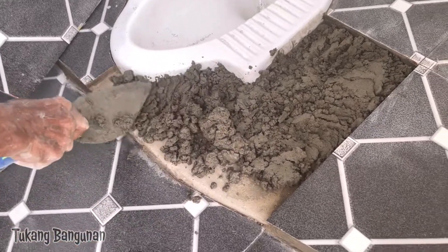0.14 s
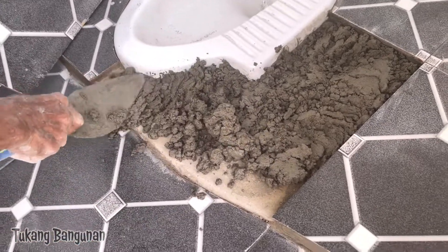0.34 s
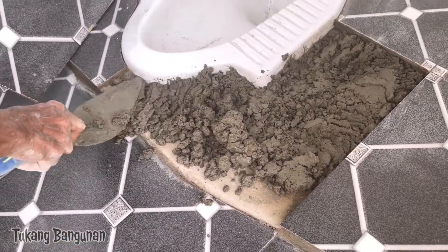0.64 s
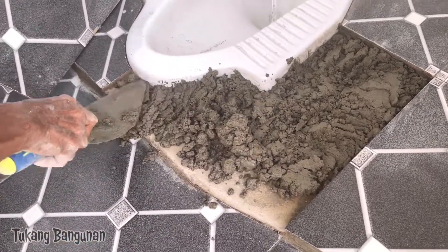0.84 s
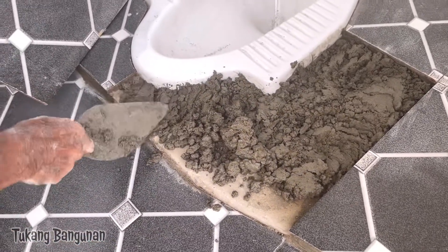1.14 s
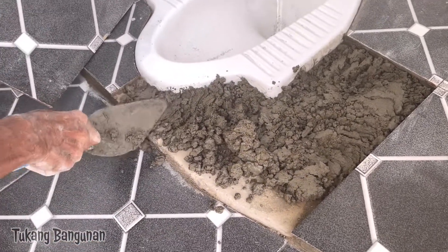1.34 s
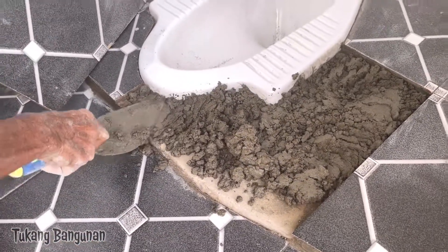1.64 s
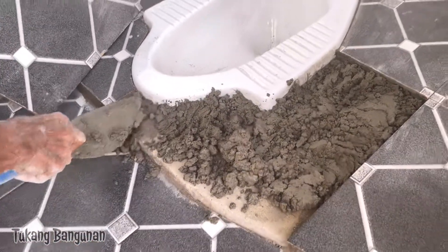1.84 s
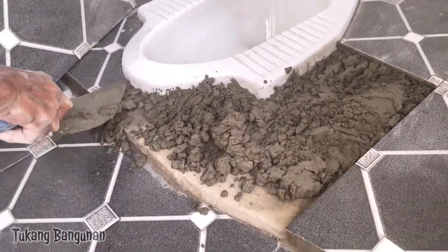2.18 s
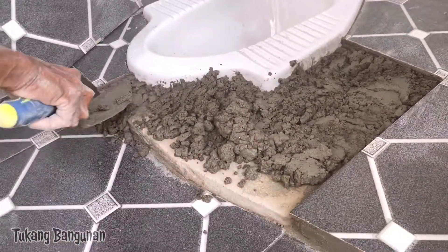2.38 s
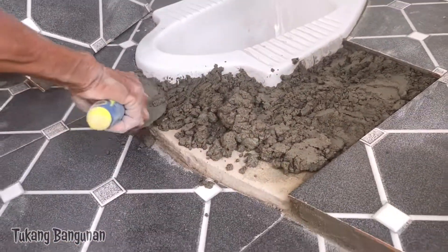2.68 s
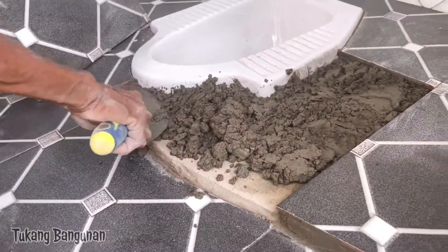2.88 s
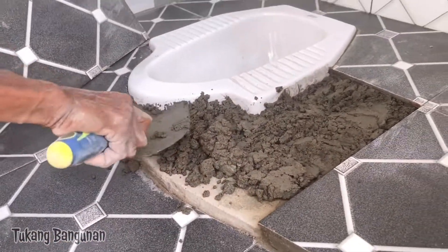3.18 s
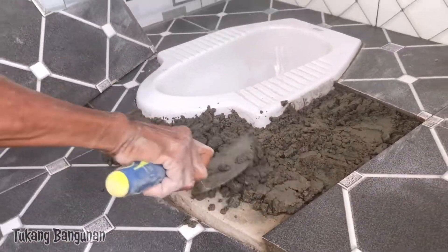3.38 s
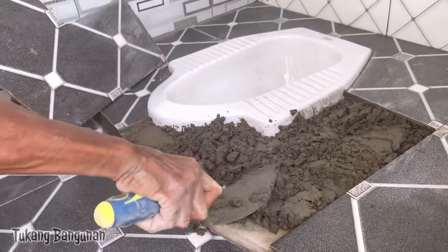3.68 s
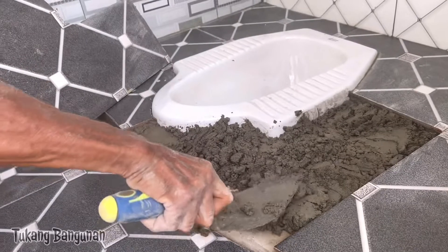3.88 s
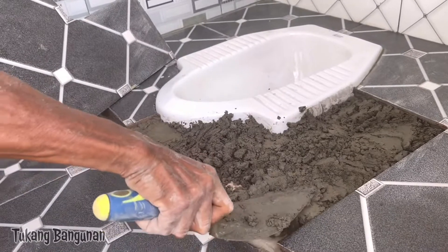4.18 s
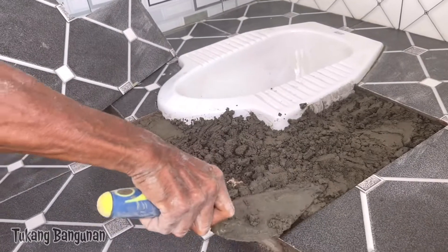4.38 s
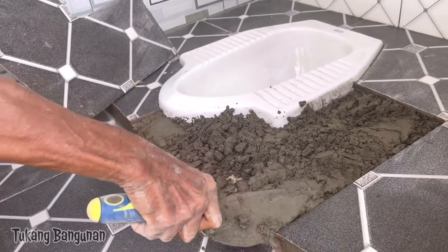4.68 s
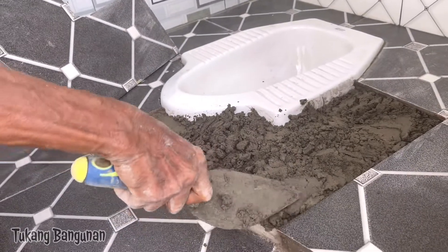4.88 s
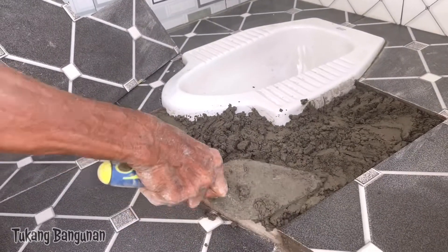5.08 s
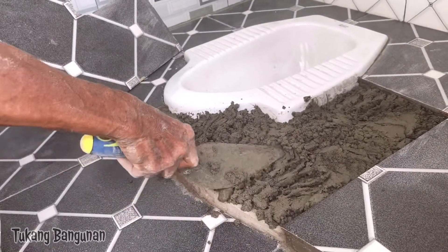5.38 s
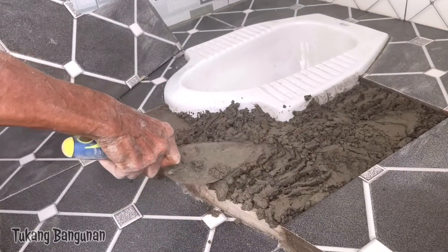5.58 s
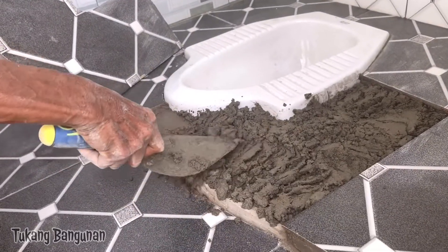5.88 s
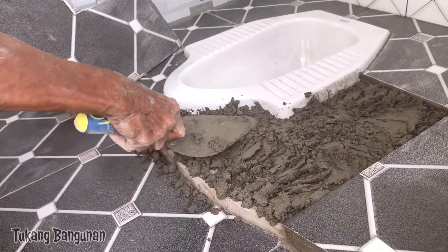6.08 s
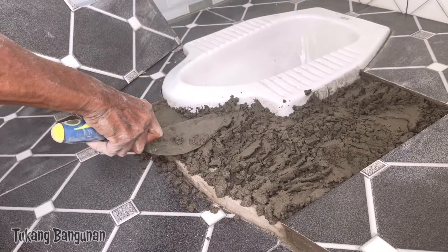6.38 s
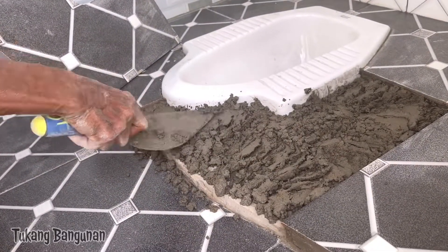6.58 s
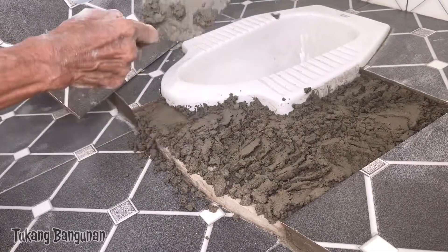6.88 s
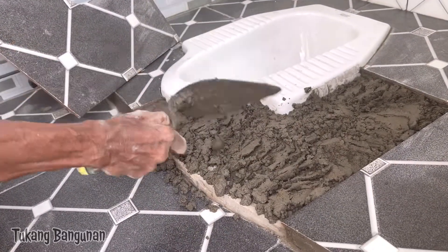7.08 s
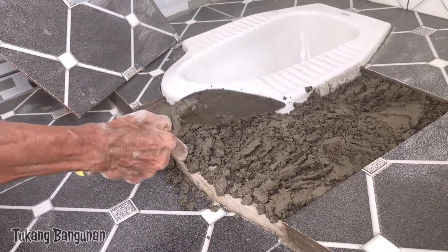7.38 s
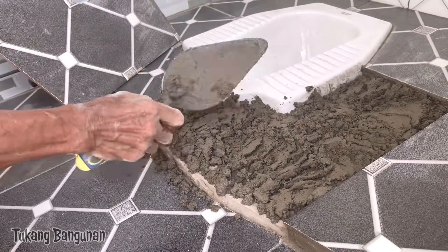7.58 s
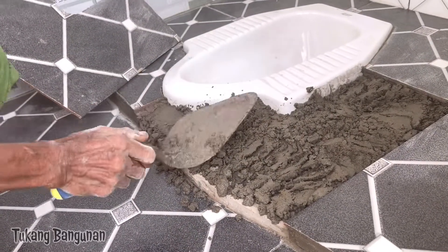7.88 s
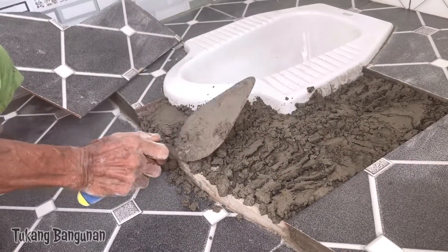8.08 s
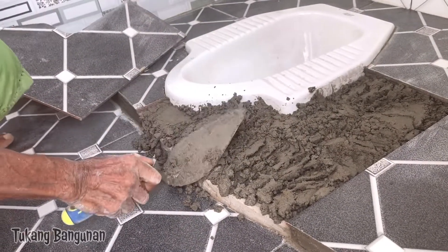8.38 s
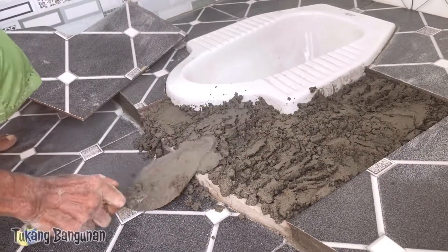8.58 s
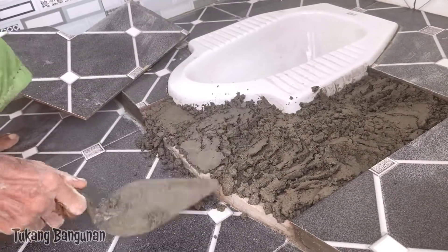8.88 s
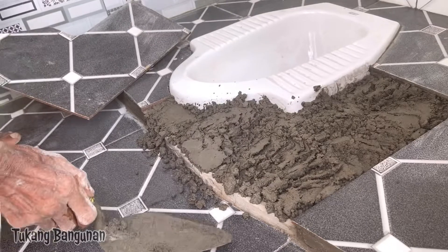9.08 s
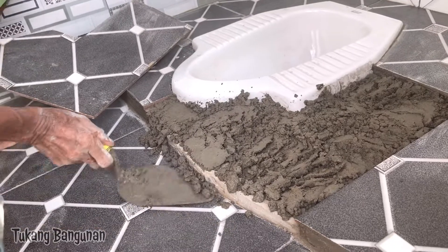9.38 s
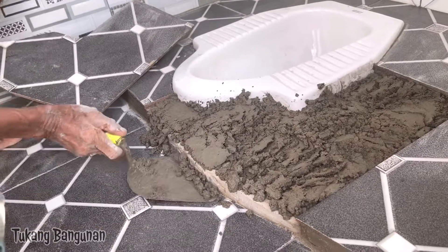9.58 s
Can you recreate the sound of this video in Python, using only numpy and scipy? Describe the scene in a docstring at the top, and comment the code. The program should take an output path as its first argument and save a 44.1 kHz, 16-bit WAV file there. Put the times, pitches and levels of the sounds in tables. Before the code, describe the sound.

A steel trowel rasps and pats damp gritty mortar in a small tiled room, with loud scraping on tile at the end.

```python
"""Trowel on damp mortar

A steel trowel spreads damp, sandy mortar in a small tiled room, an arm's length from a phone with two
microphone ports. Grit crushed under the blade hisses (filtered random grains), and coarser grains shake the
steel and bed (decaying modes). The blade knocks on tile and pats the heap, ringing on when lifted; thin
squeaks and a far bird are gliding notes, traffic is shaped noise. The ports hear the top octave out of step."""
import sys
import numpy as np
from scipy import signal
from scipy.fft import rfft, irfft, next_fast_len
from scipy.io import wavfile
from scipy.ndimage import uniform_filter1d, map_coordinates

SR = 44100
rng = np.random.default_rng(int(sys.argv[2]) if len(sys.argv) > 2 else 0)


def to_wav(s):
    """Save 16-bit WAV."""
    ch = np.atleast_2d(s).T  # columns
    pcm = np.round(np.clip(ch, -1, 1) * 32767)  # PCM
    wavfile.write(sys.argv[1], SR, pcm.astype(np.int16))


N = 429534  # samples

# modes of the free blade: (frequency [Hz], level [dB])
BLADE_MODES = [(312, -0.5), (377, 1.5), (550, -7), (660, 0.5), (790, -0.5), (1080, -1), (1453, -0.5),
               (1795, -5.5), (2541, -4), (2797, -3), (3280, -5), (3513, -5), (3935, -8), (4600, -6),
               (5550, -2.5), (6148, -2.5)]
# broad modes of blade, mortar bed and tile pressed together: (frequency [Hz], level [dB])
BED_MODES = [(305, -5), (460, -3), (900, -4), (1200, 0), (1470, -8), (2170, 1), (2850, -4), (3700, -10)]
# spectrum of crushed grit: (frequency [Hz], level [dB])
GRIT_SPECTRUM = [(1300, -36.5), (2800, -22), (6000, -17.5), (8000, -9), (9800, -7), (11000, 1),
                 (12000, -9.5), (13000, -21), (14000, -72)]
# spectrum of the rasping blade: (frequency [Hz], level [dB])
RASP_SPECTRUM = [(600, -14.5), (1100, 3.5), (1800, 11), (2600, 7), (4000, 3.5), (7000, -1), (12000, -19)]


def undb(db):
    """Amplitude factor of a level in dB."""
    return 10 ** (np.asarray(db) / 20)


def unit(x):
    """Scale to an RMS of 1."""
    return x / np.sqrt(np.mean(x ** 2))


def colour(x, shape):
    """Filter by (Hz, dB) points joined on a log axis."""
    hz, db = np.transpose(shape)
    size = next_fast_len(x.shape[-1])
    f = np.arange(size // 2 + 1) * SR / size
    gain = undb(np.interp(np.log(f + 1), np.log(hz), db))
    return irfft(rfft(x, size) * gain, size)[..., :x.shape[-1]]


def curves(table):
    """Join each column of a table over time by straight lines."""
    s, *columns = np.transpose(table)
    return [np.interp(np.arange(N) / SR, s, c) for c in columns]


def walk(rate):
    """Random levels held 1 / rate s and slewed twice; spread 1."""
    k = int(SR / rate)
    steps = np.repeat(rng.standard_normal(N // k + 1), k)
    return unit(uniform_filter1d(uniform_filter1d(steps, k), k)[:N])


def ring(x, hz, t60):
    """One decaying mode, driven by x; t60 is its time in s to fall 60 dB."""
    r = np.exp(-np.log(1000) / (t60 * SR))
    w = 2 * np.pi * hz / SR
    return signal.lfilter([0, np.sin(w)], [1, -2 * r * np.cos(w), r * r], x)


def diffuse(length):
    """Noise pair for sound from all sides, alike in the bass and the top octave."""
    # left-right difference against the common part: (frequency [Hz], level [dB])
    side_shape = [(50, -17.5), (200, -7.5), (600, 0.5), (1800, 3), (5000, 3), (8500, -7), (15000, -16)]
    mid, side = rng.standard_normal((2, length))
    side = colour(side, side_shape)
    return np.array([mid + side, mid - side])


def grains(rate, spread_db):
    """Sand grains cracking at random, rate per second: many small, a few large."""
    when = rng.random(N)
    size = np.minimum(rng.exponential(size=N), 3.5)
    return unit((when < rate / SR) * rng.standard_normal(N) * undb(spread_db * size))


def lifted(s):
    """1 while the blade is clear of the mortar and free to ring, else 0."""
    # spells of free blade: (from [s], to [s])
    spells = [(7.0, 8.3), (8.85, 9.17)]
    return sum((s > t0) * (s < t1) * 1. for t0, t1 in spells)


def ring_s(hz, free):
    """Ring time in s of a mode, free or buried in mortar: the higher, the shorter."""
    at_1khz_s = .095 if free else .028
    return at_1khz_s * (1000 / hz) ** 0.31


def pressure():
    """Levels in dB of hiss, rasp and rub: each stroke swells and fades; overlapping strokes add in power."""
    # strokes: (most pressure at [s], rise [s], fall [s], grit hiss [dB], blade rasp [dB], low rub [dB])
    stroke_table = [(0.0, .1, 0.57, -62, -64.5, -69), (.37, 0.027, 0.082, -43, -53, -49.5),
                    (.5, 0.14, 0.94, -57.5, -62, -70.5), (0.632, 0.048, 0.11, -39.5, -47.5, -54.5),
                    (.8, 0.11, 0.1, -54, -57.5, -67), (1.21, 0.11, 0.25, -51, -60.5, -82),
                    (1.45, 0.1, 0.3, -51.5, -58.5, -72), (1.54, 0.14, 0.076, -44.5, -53.5, -71),
                    (1.62, 0.1, 0.27, -51, -54, -55), (1.75, 0.027, 0.21, -51, -55, -55.5),
                    (1.84, 0.036, 0.027, -46.5, -51.5, -52), (1.98, 0.14, 0.22, -50.5, -49.5, -56.5),
                    (2.41, 0.46, 0.73, -53, -59.5, -63), (2.64, 0.16, 0.24, -49, -58.5, -69),
                    (2.929, 0.21, 0.18, -41, -51, -67), (3.011, 0.096, 0.048, -43, -62, -66),
                    (3.24, 0.25, 0.31, -70, -59.5, -54.5), (3.361, 0.097, 0.44, -47.5, -56.5, -86),
                    (3.63, 0.089, 0.3, -49.5, -57.5, -60.5), (3.811, 0.13, 0.15, -45.5, -50.5, -84),
                    (3.96, 0.1, 0.12, -41.5, -50, -77), (4.109, 0.24, 0.065, -46, -53, -63.5),
                    (4.25, 0.1, 0.081, -43.5, -50, -61.5), (4.38, 0.067, 0.06, -40.5, -45, -63),
                    (4.52, 0.11, 0.12, -41, -48.5, -65.5), (4.65, 0.043, 0.092, -40.5, -47, -61),
                    (4.822, 0.097, 0.14, -40.5, -51, -64.5), (5.118, 0.029, 0.029, -44, -51, -72),
                    (5.182, 0.071, 0.36, -41.5, -47.5, -72), (5.62, 0.24, 0.27, -47, -50.5, -76),
                    (5.785, 0.078, 0.13, -48, -56.5, -68.5), (6.14, 0.066, 0.87, -50.5, -58.5, -69),
                    (6.3, 0.47, 0.49, -54, -58, -85), (6.55, 0.53, 0.14, -46, -54, -74),
                    (7.079, 0.15, 0.14, -59, -68.5, -75), (7.5, 0.23, 0.16, -58.5, -64, -70.5),
                    (7.611, 0.11, 0.23, -53.5, -61.5, -57.5), (8.0, 0.092, 1, -55, -57.5, -67),
                    (8.55, 0.38, 0.18, -37.5, -44.5, -63), (8.64, 0.096, 0.11, -40.5, -51, -52),
                    (8.899, 0.089, 0.43, -60, -58, -58), (9.15, 0.41, 0.18, -56, -70, -72),
                    (9.211, 0.0033, 0.012, -23, -49, -62), (9.24, 0.0091, 0.015, -27.5, -40.5, -51),
                    (9.265, 0.022, 0.066, -23.5, -39, -45.5), (9.33, 0.14, 0.23, -31, -43.5, -53.5),
                    (9.427, 0.14, 0.049, -22.5, -40.5, -49), (9.469, 0.033, 0.12, -28, -45.5, -78),
                    (9.582, 0.012, .016, -24, -62, -67), (9.605, 0.034, 0.096, -27, -46, -57)]
    # resting level under the strokes: (hiss [dB], rasp [dB], rub [dB])
    rest_levels = (-99, -91.5, -80.5)
    fade_depths = (1, 1, 0.83)  # share of the fade that hiss, rasp and rub follow
    t = np.arange(0, N / SR, .001)
    peak, rise, fall, *tops_db = np.transpose(stroke_table)[:, :, None]
    away = np.where(t < peak, (peak - t) / rise, (t - peak) / fall)
    fade_db = 27 * away ** 1.474  # 27 dB lost over one rise or fall time
    levels = []
    for top_db, depth, rest_db in zip(tops_db, fade_depths, rest_levels):
        power = np.sum(undb(top_db - depth * fade_db) ** 2, axis=0) + undb(rest_db) ** 2
        levels.append(np.interp(np.arange(N) / SR, t, 10 * np.log10(power)))
    return levels


def shaken_modes(coarse, modes, free):
    """Coarse grains ring the bed or blade; grip and load shift, so each mode comes and goes on its own."""
    tilt_db, sway_db, sway_rate, shorten = (2.5, 4.5, 10, .6) if free else (0, 3, 35, .4)
    total = 0
    for hz, db in modes:
        level_db = db + tilt_db * np.log2(hz / 1000) + sway_db * walk(sway_rate)
        total = total + undb(level_db) * unit(ring(coarse, hz, shorten * ring_s(hz, free)))
    # modes slide as the bed thins or the blade bends: read faster and slower
    swing_s = .003 if free else .016
    where = np.arange(N) + swing_s * SR * walk(4)
    return map_coordinates(unit(total), [where], order=1, mode="mirror")


def strokes():
    """Grit hisses, shakes the blade and rubs the bed; the drag catches and slips, more so when pressed hard."""
    # spectrum of the low rub: (frequency [Hz], level [dB])
    rub_spectrum = [(150, -34), (280, 1.5), (450, -4), (750, -0.5), (1100, -12.5), (1600, -87.5)]
    hiss_db, rasp_db, rub_db = pressure()
    lift = uniform_filter1d(lifted(np.arange(N) / SR), SR // 20)
    drag_db = 0.83 * walk(45) + 0.19 * np.maximum(hiss_db + 44, 0) * walk(90)
    grit = grains(12000, 0.21)
    coarse = grains(5000, 2.85)
    bed = shaken_modes(coarse, BED_MODES, False)
    blade = shaken_modes(coarse, BLADE_MODES, True)
    # hard pressure crushes lumps, which ring bed and blade more
    crush = .3 * undb(.4 * np.maximum(rasp_db + 48, 0))
    shaken = coarse + crush * (1 - lift) * (bed + .6 * blade) + .7 * lift * blade
    hiss = unit(colour(grit + 0.43 * lift * blade, GRIT_SPECTRUM)) * undb(hiss_db + drag_db)
    rasp = unit(colour(shaken, RASP_SPECTRUM)) * undb(drag_db + rasp_db + 0.18 * walk(25))
    rub = unit(colour(shaken, rub_spectrum)) * undb(rub_db + 2 * walk(15))
    return hiss + rasp + rub


def tones(table, rough_t60, rise, octave_db, bluntness):
    """Swelling notes, each a narrow band of noise with a weak octave, gliding by the share rise either side."""
    out = np.zeros(N)
    decay = np.exp(-np.log(1000) / (rough_t60 * SR))
    wobble = signal.lfilter([1], [1, -decay], rng.standard_normal((2, N)))
    wobble = wobble / wobble.std()
    for s, length, hz, db in table:
        i, n = int(max(s, 0) * SR), int(length * SR)
        phase = np.cumsum(2 * np.pi * hz / SR * (1 + rise * np.linspace(-1, 1, n)))
        # roughness grows with the length of the note
        a, b = 12 * length * wobble[:, i:i + n]
        octave = undb(octave_db - 8 * np.log2(hz / 1000)) * np.sin(2 * phase)
        note = (1 + a) * (np.sin(phase) + octave) + b * np.cos(phase)
        out[i:i + n] += undb(db) * np.hanning(n) ** bluntness * unit(note)
    return out


def squeaks():
    """Squeaks and thin rings, rough tones that sink slightly."""
    # notes: (start [s], length [s], middle pitch [Hz], level [dB])
    squeak_table = [(0, 0.18, 2710, -61.5), (.836, 0.018, 895, -37.5), (1.75, 0.11, 2000, -50),
                    (2.13, 0.1, 2760, -62), (7.0, 0.2, 6080, -72), (7.12, .15, 3420, -70.5),
                    (8.91, 0.12, 663, -55.5)]
    return tones(squeak_table, rough_t60=.01, rise=-.01, octave_db=-13, bluntness=1)


def room(x):
    """Tiled walls: dense echoes from 4 ms on, the treble dying first."""
    t60_s, treble_t60_s, level_db = 0.3, 0.078, -8
    t = np.arange(SR // 2) / SR
    echo = diffuse(len(t)) * (t > .004)
    low = signal.lfilter(*signal.butter(1, 2500, fs=SR), echo)
    treble = echo - low
    echo = low * undb(-60 * t / t60_s) + treble * undb(-60 * t / treble_t60_s)
    echo = echo / np.sqrt(np.sum(echo ** 2) / 2)
    return undb(level_db) * signal.oaconvolve(x[None], echo, axes=1)[:, :N]


def outside():
    """Traffic's swelling rumble and wavering hum, and faint air, all from noise shaped in pitch and level."""
    # traffic: (time [s], rumble level [dB], hum level [dB])
    traffic = [(0.0, -53.5, -56.5), (1.05, -55.5, -65), (1.3, -60.5, -58), (2.7, -59, -63),
               (3.25, -55.5, -54), (3.6, -57, -67), (4.15, -52.5, -59), (5.7, -58.5, -63),
               (6.15, -49, -66.5), (6.45, -57.5, -68.5), (9.35, -55, -62)]
    # spectrum of the rumble: (frequency [Hz], level [dB])
    rumble_spectrum = [(35, -5.5), (58, 3), (100, -6), (160, -12), (250, -19.5), (500, -24), (900, -72)]
    # spectrum of the faint air: (frequency [Hz], level [dB])
    air_spectrum = [(400, 19.5), (1100, 10.5), (2300, 28), (3600, 8.5), (7800, 27.5), (11000, -24.5),
                    (12800, -62)]
    hum_hz, hum_width_hz = 154.5, 9.7
    rumble_db, hum_db = curves(traffic)
    rumble = unit(colour(diffuse(N), rumble_spectrum)) * undb(rumble_db + 1.3 * walk(5.9))
    hum_t60 = np.log(1000) / (np.pi * hum_width_hz)
    hum = unit(ring(rng.standard_normal(N), hum_hz, hum_t60)) * undb(hum_db)
    air = unit(colour(diffuse(N), air_spectrum)) * undb(-69.5 + 2.1 * walk(9))
    return rumble + hum + air


def bird():
    """A far bird: short rough notes that glide upwards."""
    # notes: (start [s], length [s], middle pitch [Hz], level [dB])
    bird_table = [(.275, 0.017, 1745, -56), (.295, 0.048, 2026, -50.5), (.95, 0.046, 2105, -59),
                  (4.865, 0.054, 1730, -53.5), (4.88, 0.131, 1990, -58.5), (6.0, 0.048, 1730, -62),
                  (6.055, 0.048, 1960, -58.5)]
    return tones(bird_table, rough_t60=.004, rise=.035, octave_db=-35, bluntness=.5)


def knocks():
    """A short rough contact and crumbling mortar ring the bed, or the free blade, and crack the grit."""
    # knocks: (time [s], body peak [dB], crack peak [dB], loudest pitch [Hz])
    knock_table = [(0.347, -41, -36, 1050), (0.372, -19.5, -30.5, 1170), (0.605, -35, -23, 860),
                   (0.632, -28.5, -23, 1004), (1.567, -35.5, -28, 2310), (1.59, -37, -21.5, 910),
                   (1.675, -37, -62, 697), (1.732, -33.5, -36, 890), (1.822, -33, -49, 1084),
                   (1.964, -16.5, -23.5, 1193), (2.283, -43, -32.5, 935), (2.513, -40, -68, 379),
                   (3.196, -27, -54.5, 892), (4.643, -20.5, -14.5, 1278), (4.264, -43.5, -68, 764),
                   (7.005, -59, -43.5, 3280), (7.272, -57.5, -69, 2300), (7.609, -37, -41.5, 545),
                   (7.845, -42, -44.5, 640), (7.926, -45.5, -41, 666), (7.971, -42, -36.5, 544),
                   (7.999, -39.5, -40, 544), (8.089, -29.5, -31, 850), (8.163, -37.5, -36, 630),
                   (8.594, -25.5, -40, 648), (8.612, -31, -32, 340), (8.902, -39.5, -32, 1250),
                   (9.206, -32.5, -20, 435), (9.262, -27, -17, 1350), (9.287, -26, -47, 1039),
                   (9.339, -26, -50, 1430), (9.434, -30, -37, 2450), (9.594, -39, -27, 2570)]
    out = np.zeros(N + SR)
    t = np.arange(SR // 5) / SR
    luck = rng.standard_normal((len(knock_table), 2, len(BLADE_MODES)))
    noise = rng.standard_normal((len(knock_table), 2, len(t)))
    for (s, body_db, crack_db, centre_hz), (gain, detune), (push, snap) in zip(knock_table, luck, noise):
        free = lifted(s)
        hz, db = np.transpose(BLADE_MODES if free else BED_MODES)
        if not free:  # the bed under each blow is thicker or thinner, which shifts all its modes
            hz = hz * centre_hz / hz[np.argmin(np.abs(np.log(hz / centre_hz)))]
        # low-pitched knocks press longer; mortar crumbles on after the contact
        contact = np.exp(-t / (0.0055 * (1000 / centre_hz) ** 0.61))
        crumble = 0.058 * (1 - free) * np.exp(-t / 0.016)
        touch = (1 - np.exp(-t / 0.00079)) * (contact + crumble)
        detuned_hz = hz * (1 + (0.008 if free else 0.03) * detune[:len(hz)])
        modes = np.array([unit(ring(push * touch, f, ring_s(f, free))) for f in detuned_hz])
        # modes far from the loudest pitch are weaker; a soft pat, with little crack, loses more treble
        dull_db = 3.0 + 0.39 * max(body_db - crack_db, 0)  # per octave
        octaves = np.log2(hz / centre_hz)
        place_db = -dull_db * np.maximum(octaves, 0) - 8 * np.maximum(-octaves, 0)
        body = undb(db + place_db + 2 * gain[:len(hz)]) @ modes
        body = signal.lfilter(*signal.butter(2, 0.33 * centre_hz, "high", fs=SR), body)
        crack = unit(colour(snap, GRIT_SPECTRUM)) + 0.25 * unit(colour(snap, RASP_SPECTRUM))
        crack = crack * np.exp(-t / 0.0053)
        # a free blade also rings in all its modes with the crack
        bright = undb(db + 8.6 * np.log2(hz / 1000)) @ modes
        crack = crack / np.abs(crack).max() + 0.15 * free * bright / np.abs(bright).max()
        i = int(s * SR)
        out[i:i + len(t)] += undb(body_db) * body / np.abs(body).max() + undb(crack_db) * crack
    return out[:N]


def scene():
    """Trowel and bird sound directly and off the tiles, over the traffic and air."""
    sources = strokes() + knocks() + bird()
    thin = squeaks()
    # squeaks and thin rings go more weakly into the room
    return sources + thin + room(sources + .4 * thin) + outside()


def record(dry):
    """The left port is brighter in the presence range and lags in the top octave; the top is cut."""
    # gain of the left port: (frequency [Hz], level [dB])
    left_gain = [(1800, 0), (3200, 2.5), (5100, 4.5), (7100, 0), (8400, 0)]
    # lag of the left port behind the right: (frequency [Hz], lag [turns])
    left_lag = [(1500, 0), (3000, -.16), (4000, -.07), (6500, 0), (7500, -.13), (8600, 0), (17100, 2.5)]
    top_hz = 15800
    size = next_fast_len(N)
    lag = np.interp(np.arange(size // 2 + 1) * SR / size, *np.transpose(left_lag))
    spectrum = rfft(colour(dry[0], left_gain), size)
    left = irfft(spectrum * np.exp(-2j * np.pi * lag), size)[:N]
    top_cut = signal.ellip(10, .2, 80, top_hz, fs=SR, output="sos")
    return signal.sosfilt(top_cut, np.array([left, dry[1]]))


dry = scene()
out = record(dry)
to_wav(out)
```